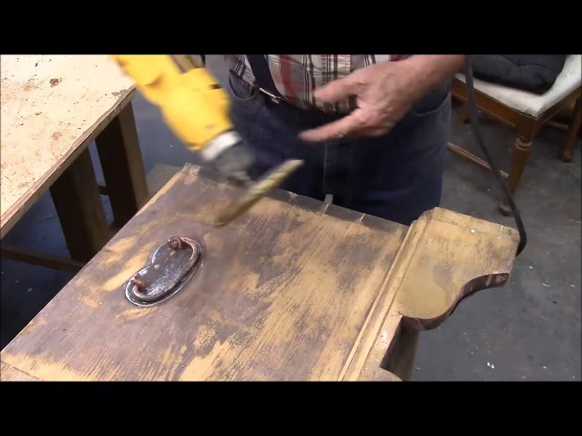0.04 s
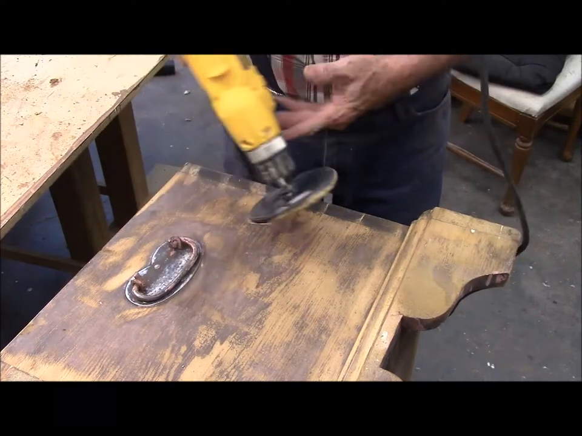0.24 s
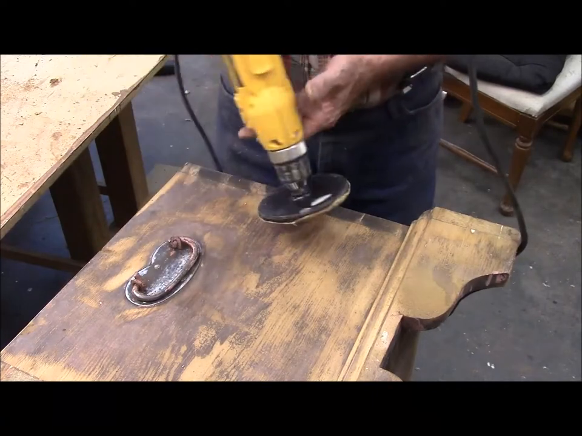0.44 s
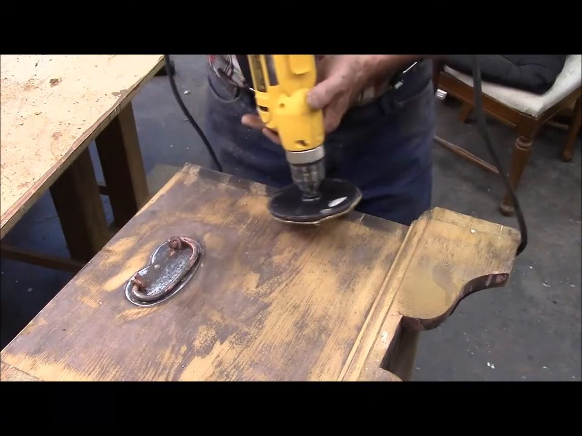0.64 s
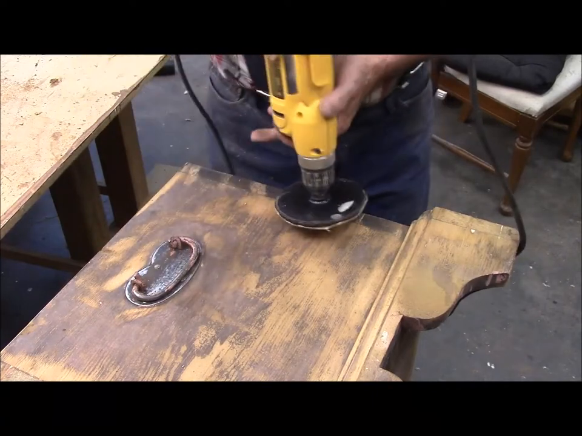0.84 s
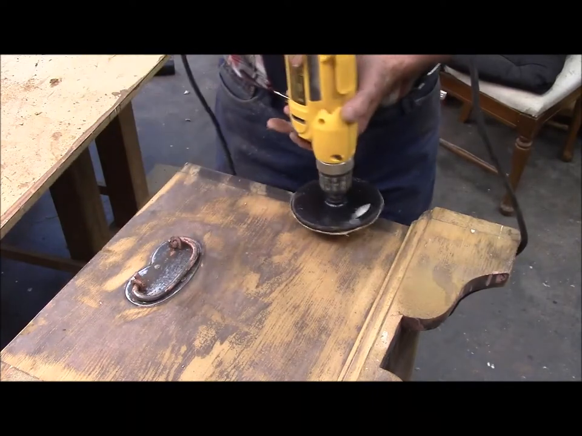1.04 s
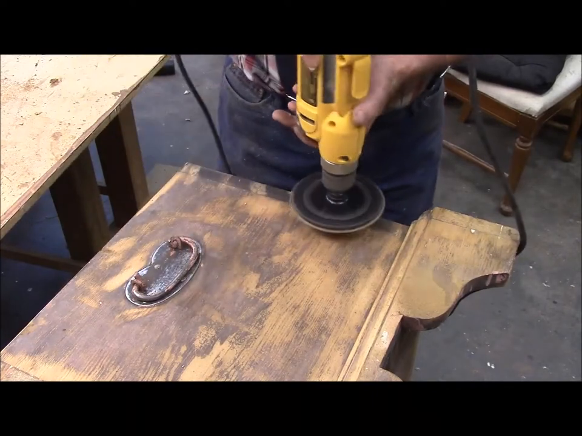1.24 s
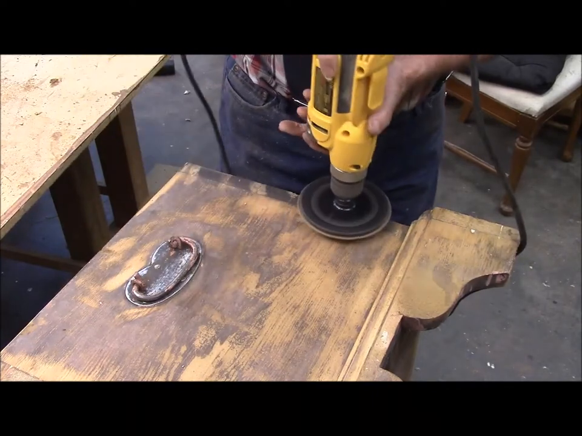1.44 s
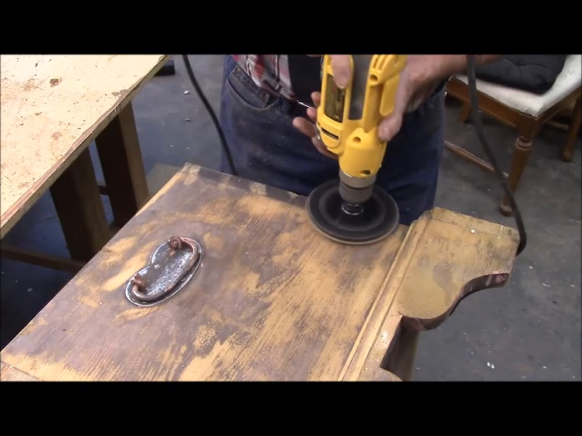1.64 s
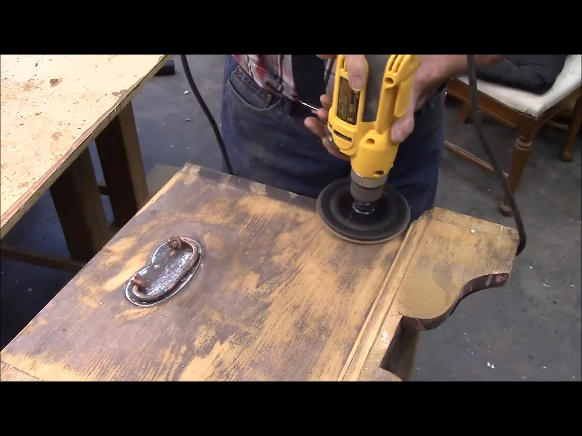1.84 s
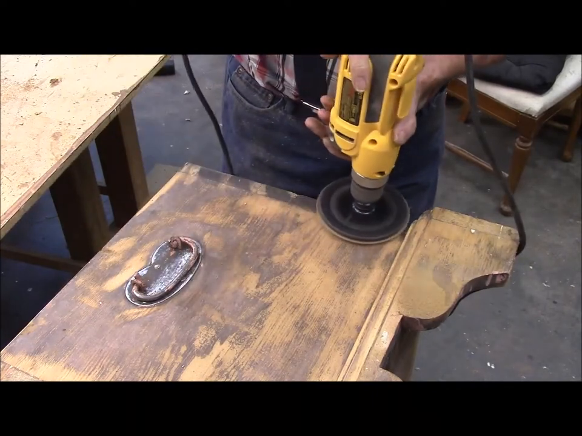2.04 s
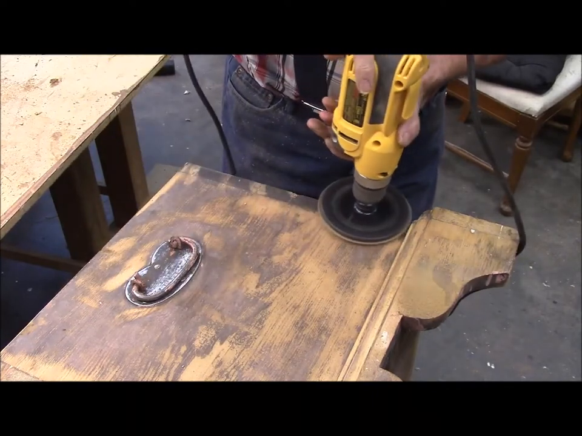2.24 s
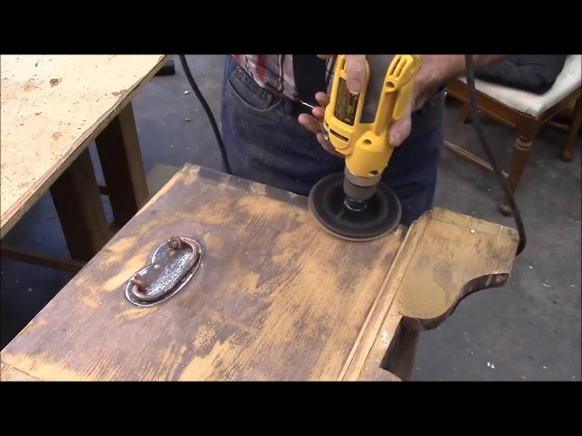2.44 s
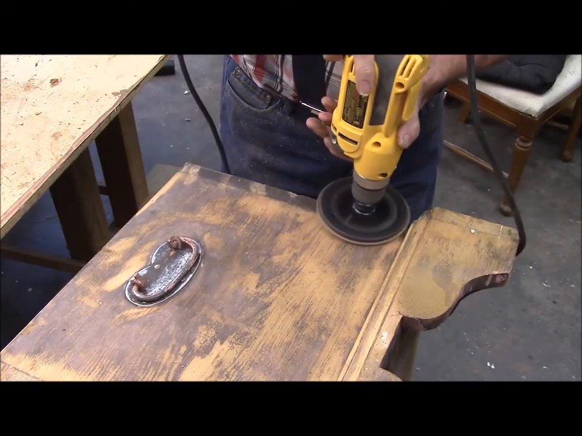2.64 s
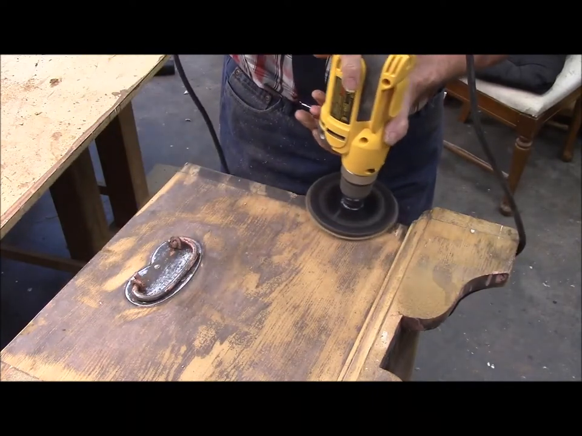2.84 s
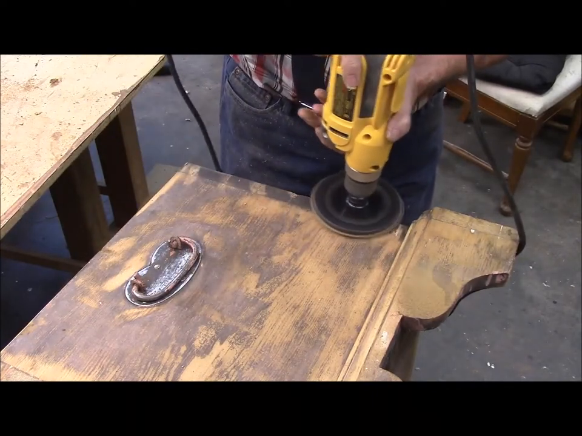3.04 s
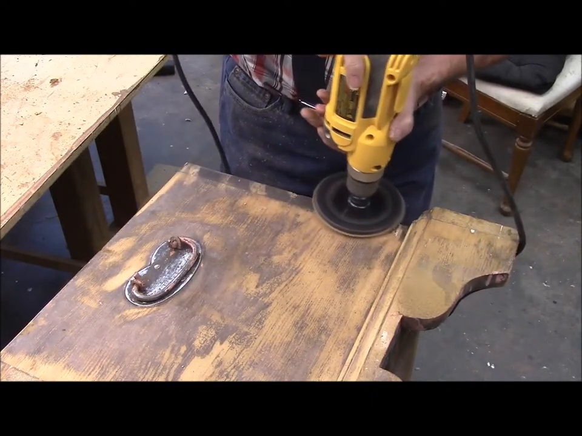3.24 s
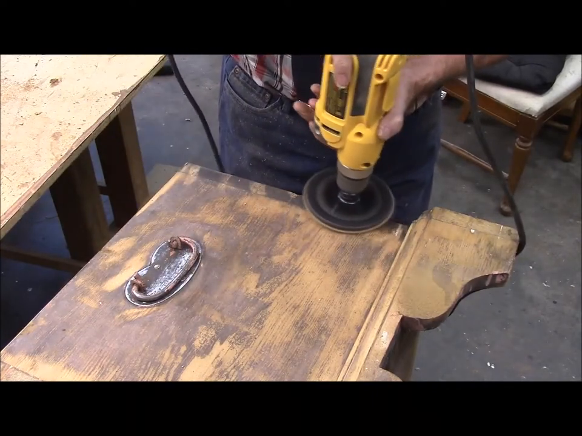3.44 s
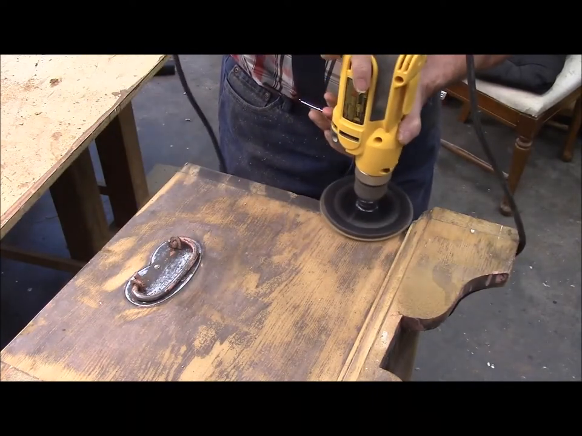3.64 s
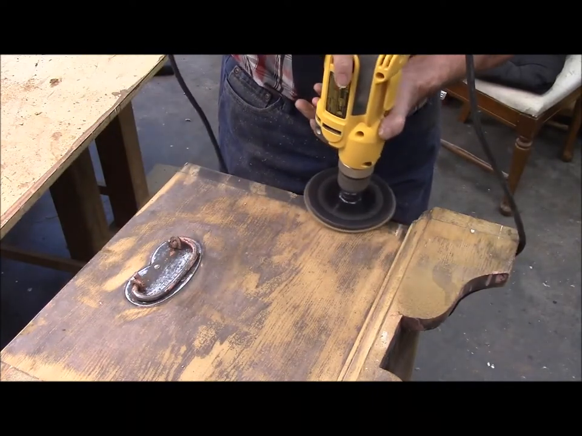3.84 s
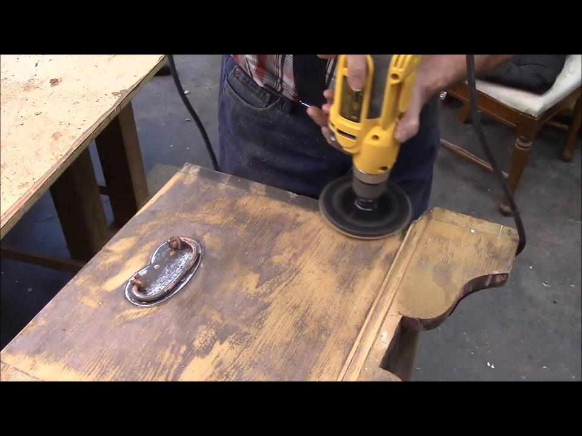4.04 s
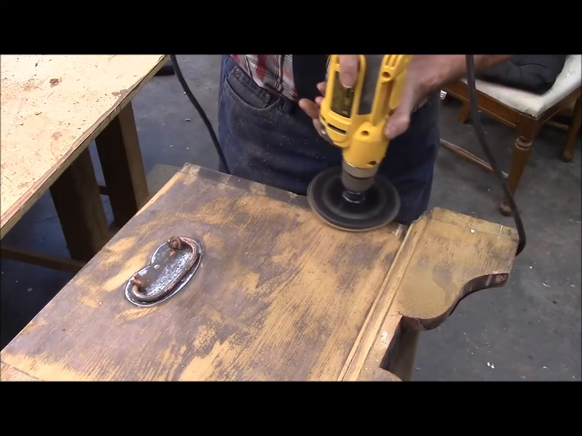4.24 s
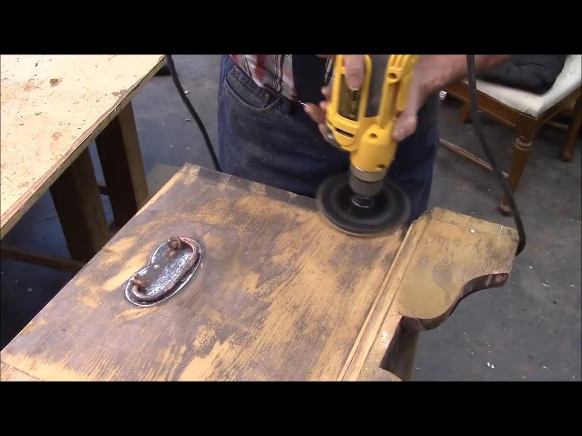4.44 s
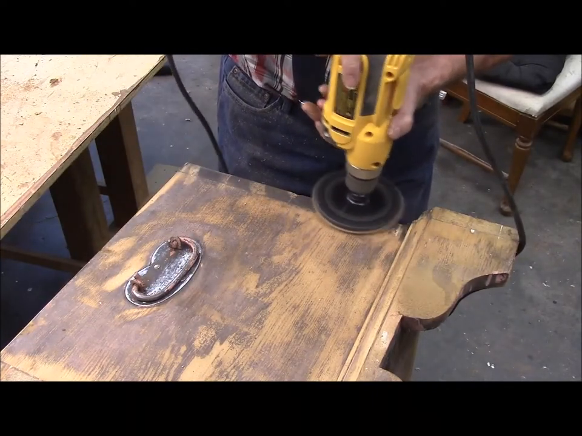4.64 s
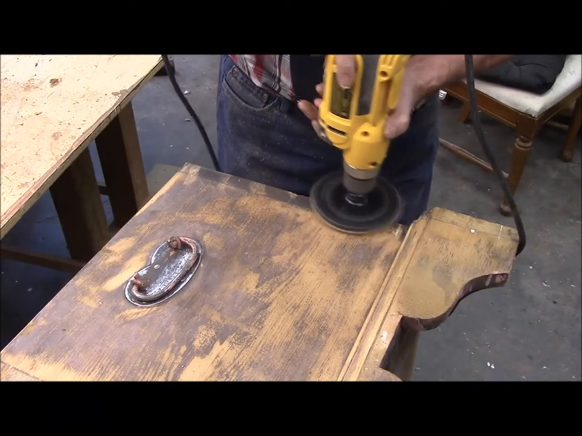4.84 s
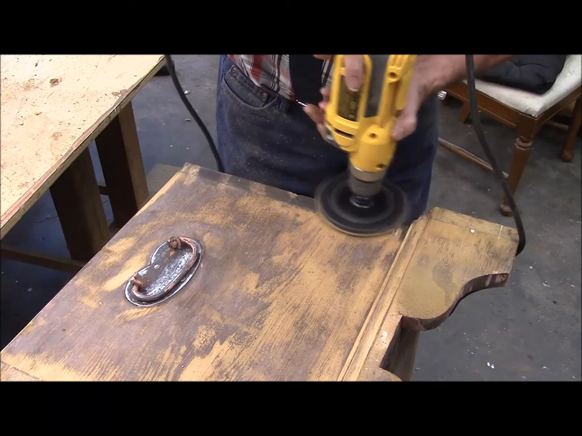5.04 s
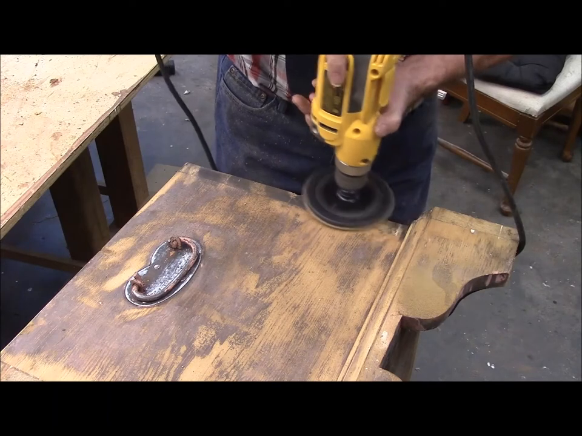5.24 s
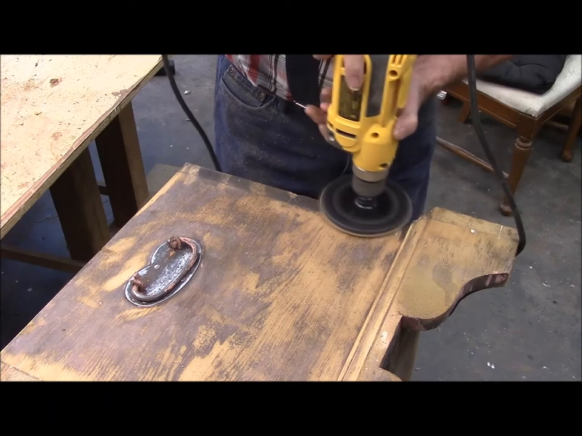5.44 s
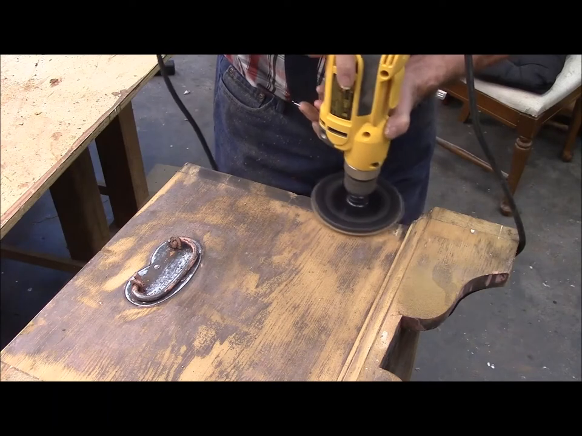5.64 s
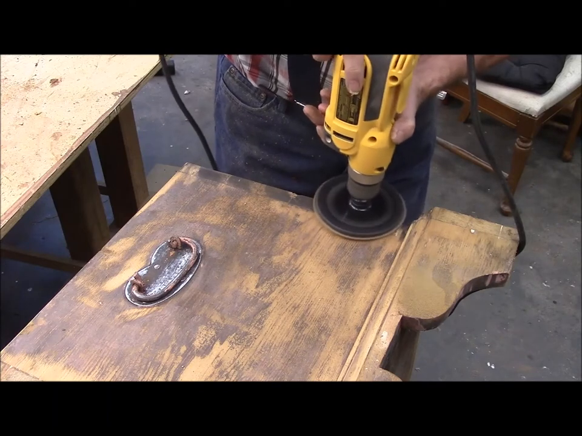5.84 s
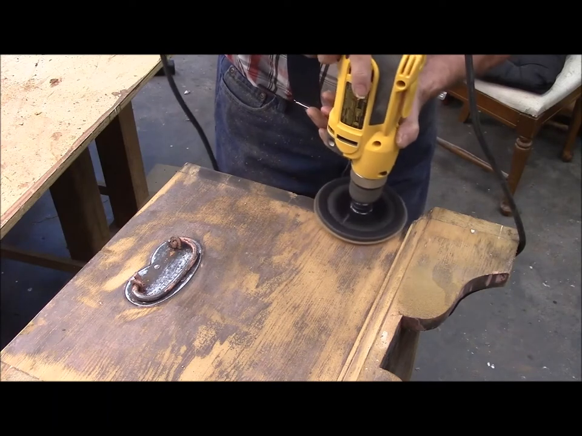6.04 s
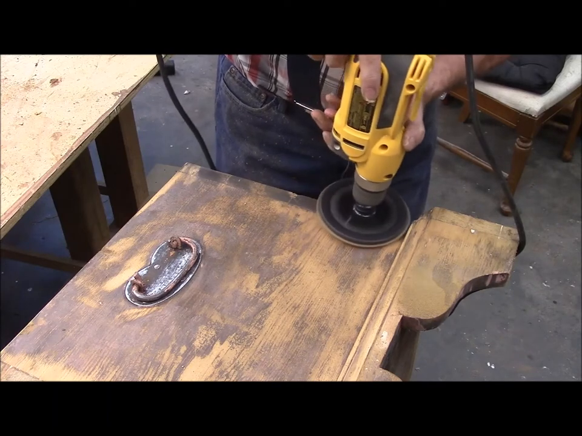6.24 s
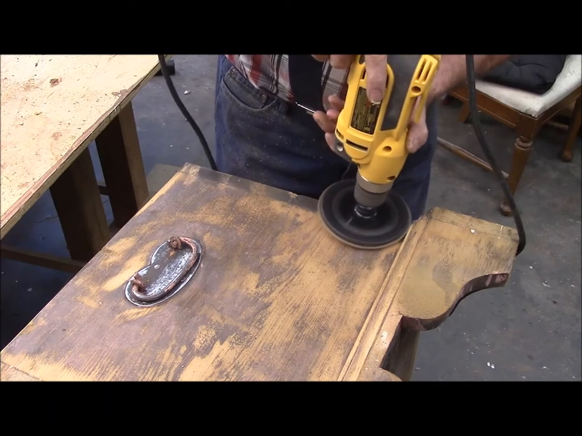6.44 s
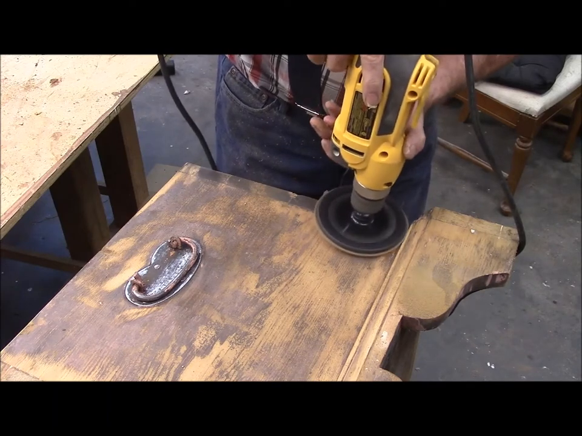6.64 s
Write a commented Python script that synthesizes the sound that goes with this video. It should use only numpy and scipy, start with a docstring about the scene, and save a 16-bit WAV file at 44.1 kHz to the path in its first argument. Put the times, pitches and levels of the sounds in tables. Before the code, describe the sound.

From 0 to about 1.1 seconds there is only a quiet workshop: low fan hum and rumble, soft clothing rustle, and tiny ticks of hands on a plastic housing near 0.1, 0.4 and 0.8. At about 1.08 a tight burst of hard, dry gear clacks lasts a tenth of a second with a short room wash. The drill motor leaps up, reaching a first pitch by 1.3, sags slightly with a labouring, buzzing growl and a thin whistle, then climbs again from 1.45 to about 1.9. It peaks near 2.1, eases down by 3.5 and stays nearly level, rising a touch around 5.8 and dipping at the end. Throughout, a loud low drone and whine carry grainy gear rattle, coarse scraping and bright abrasive hiss on wood, fluttering with disc rotation and small pressure changes. The sound is close and centred, still running at the cutoff around 6.7.

```python
"""Electric drill sanding a wooden panel

A workshop fan hums and clothes rustle; hands tick on the housing, then the gears clack as they take up slack.
The motor runs up in two steps, then sags a little under load: shaft speed sets the tones, whine and labouring.
Rattle, scrape and hiss are filtered noises that follow pad pressure and waver with shaft and pad rotation.
Both channels carry the same signal."""
import sys
import numpy as np
from scipy.fft import rfft, irfft, next_fast_len
from scipy.io import wavfile
from scipy.ndimage import uniform_filter1d, map_coordinates

SR = 44100
rng = np.random.default_rng(int(sys.argv[2]) if len(sys.argv) > 2 else 0)


def store_pcm(level_fs):
    """Save levels as 16-bit WAV."""
    pcm = np.round(np.clip(level_fs, -1, 1) * 32767).astype(np.int16)
    wavfile.write(sys.argv[1], SR, np.atleast_2d(pcm).T)


N = 295911
TIME = np.arange(N) / SR
CRUISE_HZ = 438  # working speed of the motor shaft, turns per second


def amp(db):
    """Decibels to gain."""
    return 10 ** (np.asarray(db) / 20)


def unit(x):
    """Scale to rms 1."""
    return x / np.sqrt(np.mean(x ** 2) + 1e-20)


def curves(rows):
    """One value per sample for each column after the time."""
    s, *cols = np.transpose(rows)
    return [np.interp(TIME, s, c) for c in cols]


def wobble(rate_hz):
    """A smooth random curve with rate_hz knots a second."""
    knots = rng.standard_normal(int(N * rate_hz / SR) + 4)
    return map_coordinates(knots, [TIME * rate_hz])


def filtered(x, response):
    """Multiply the spectrum of x by a response of frequency."""
    size = next_fast_len(N + SR // 2)
    spectrum = rfft(x, size) * response(np.fft.rfftfreq(size, 1 / SR))
    return irfft(spectrum, size)[..., :N]


def muffled(x, edge_hz, order):
    """Low-pass of the given steepness."""
    return filtered(x, lambda hz: (1 + (hz / edge_hz) ** (2 * order)) ** -.5)


def noise(spectrum, flutter=1):
    """Noise of rms 1, shaken by flutter and then coloured by (f/Hz, level/dB) points."""
    hz, db = np.transpose(spectrum)
    colour = lambda f: amp(np.interp(np.log(f + 1), np.log(hz), db))
    return unit(filtered(rng.standard_normal(N) * flutter, colour))


def partial(angle, order, rough, rate_hz, in_step=False):
    """One multiple of a rotation at rms 1, wavering in size and phase."""
    waver = 1 + rough * (wobble(rate_hz) + 1j * wobble(rate_hz))
    offset = 0 if in_step else 2 * np.pi * rng.random()
    return unit(np.real(waver * np.exp(1j * (order * angle + offset))))


def bursts(events, t60_s):
    """A sharp rise and an exponential decay at each (t/s, level/dB) row."""
    total = 0
    for s, db in events:
        total = total + amp(db - 60 * np.maximum(TIME - s, 0) / t60_s) * (TIME >= s)
    return total


def workshop():
    """A fan hums, clothes rustle and hands tick; the recorder turns all of these down once the loud drill runs."""
    # before the drill starts [t/s, room rumble level/dB, clothes rustle level/dB]
    idle = [(0, -33, -50), (.2, -29.5, -45.5), (.55, -30, -44), (.79, -27.5, -47.5), (.82, -27.5, -40),
            (.87, -24.5, -40.5), (.93, -28, -41), (1.05, -26, -39)]
    # fan tones [f/Hz, relative level/dB]
    fan_tones = [(58, -15), (407, -2), (815, -15), (1223, -23)]
    # room rumble spectrum [f/Hz, relative density/dB]
    room_spectrum = [(15, -37), (25, -17), (113, -9.5), (334, -10), (399, -5.5), (521, -8.5), (812, -13),
                     (991, -18), (1260, -19.5), (1480, -24.5), (1690, -22), (2350, -30), (5000, -43),
                     (6500, -57), (11000, -120)]
    # clothes rustle spectrum [f/Hz, relative density/dB]
    rustle_spectrum = [(1470, -29), (2500, -1), (4080, -1.5), (5470, -3.5), (9650, -2.5), (13800, -9),
                       (15100, -26), (15600, -20)]
    # light ticks of the hands on the housing [t/s, relative peak level/dB]
    ticks = [(0.1002, -37), (0.3751, -27), (0.8056, -18)]

    room_db, rustle_db = curves(idle)
    recorder_gain_db, = curves([(1.08, 1.5), (1.2, -13), (1.6, -14.5), (3, -16)])  # t/s, gain/dB
    hum = sum(amp(db) * partial(2 * np.pi * hz * TIME, order=1, rough=0.15, rate_hz=16) for hz, db in fan_tones)
    rumble = amp(0.69 * wobble(14)) * noise(room_spectrum)
    air = amp(room_db) * (rumble + amp(-1.0) * hum)
    rubbing = amp(rustle_db + wobble(6.9))
    tapping = amp(-16) * bursts(ticks, t60_s=0.03)
    hands = (rubbing + tapping) * noise(rustle_spectrum, amp(1.7 * wobble(900)))
    return (air + hands) * amp(recorder_gain_db)


def clacks():
    """Each blow of the teeth jars the gearbox, with a short wash from the bench and walls."""
    # gear teeth taking up slack [t/s, relative peak level/dB]
    blows = [(1.0795, 3), (1.0875, -6), (1.1135, -9), (1.1185, -11), (1.1298, -0.5), (1.1385, 4),
             (1.162, -3), (1.1795, 2), (1.1865, -16)]
    # gearbox spectrum [f/Hz, relative density/dB]
    gearbox = [(150, -26), (400, 1.5), (900, 2), (1450, -1), (1850, -1), (2300, -6), (2700, -16),
               (3600, -34), (4200, -15), (5800, -25), (6900, -17), (11000, -27), (15500, -47)]

    direct = bursts(blows, t60_s=0.0082)
    wash = amp(-19.5) * bursts(blows, t60_s=0.17)
    return amp(-1) * (direct + wash) * noise(gearbox)


def motor(angle, speed_hz, labour):
    """Slots whine as the motor gains speed; labouring gears growl, chopped by the speed control."""
    # slot whine [multiple of the shaft, level at working speed/dB, slope/dB per octave of speed]
    slot_orders = [(12, -35.5, -16), (40, -33.5, -7)]
    # whine of the labouring motor [multiple of the shaft, level at full labour/dB]
    labour_orders = [(23, -47), (25, -49), (29, -47), (36, -49), (40, -56)]
    # thin commutator whistle [t/s, level/dB]
    whistle_level = [(1.17, -42), (1.3, -37), (1.45, -35), (1.7, -35), (1.85, -42), (2, -56), (3.2, -53),
                     (3.9, -44), (6.6, -43)]
    # casing resonance [f/Hz, relative density/dB]
    casing = [(400, -28), (800, -10.5), (960, -1), (1030, 6), (1120, -2), (1300, -23), (2200, -86)]
    mains_hz = 60

    gain_hz_per_s = np.maximum(uniform_filter1d(np.gradient(speed_hz) * SR, size=2205), 0)  # 50 ms mean
    pull = np.minimum(gain_hz_per_s / 1400, 1) ** 0.65 * np.clip(speed_hz / 200, 0, 1) ** 7
    octaves = np.log2((speed_hz + 1) / CRUISE_HZ)
    slots = pull * sum(amp(db + slope * octaves) * partial(angle, order=round(k), rough=0.41, rate_hz=120)
                       for k, db, slope in slot_orders)
    whine = muffled(slots, edge_hz=11700, order=20)  # the housing holds in the highest whine
    whine += labour * sum(amp(db) * partial(angle, order=round(k), rough=0.7, rate_hz=130)
                          for k, db in labour_orders)
    whine += amp(curves(whistle_level)[0]) * partial(angle, order=24, rough=0.25 + .4 * labour, rate_hz=70)
    growl_gain = amp(-38.5 + 22.6 * labour) * np.clip(speed_hz / 230, 0, 1) ** 2
    growl = growl_gain * noise(casing)
    ripple = np.cos(2 * np.pi * 2 * mains_hz * TIME)
    chopping = 1 + (0.09 + 0.46 * labour) * ripple
    return chopping * (whine + growl) + amp(-56.5) * ripple


def housing_db(hz):
    """Boost of a tone as it passes the resonances of the housing."""
    # resonances that lift a passing shaft order [f/Hz, half width/Hz, boost/dB]
    resonances = [(1060, 90, 15), (1674, 220, 11), (4360, 120, 8.5)]
    return sum(db / (1 + ((hz - centre) / width) ** 4) for centre, width, db in resonances)


def shaft_tones(angle, speed_hz, press_db):
    """Imbalance sounds the low orders; fan and bearings add weak high ones."""
    # first shaft order [t/s, level/dB]
    first_level = [(1.14, -24), (1.22, -18), (1.3, -15.5), (1.43, -16.5), (1.8, -11.5), (2.05, -13),
                   (2.9, -13), (3.65, -14.5), (5.2, -14), (6.2, -13.5), (6.7, -14.5)]
    # second shaft order [t/s, level/dB]
    second_level = [(1.17, -31), (1.24, -26), (1.36, -20), (1.58, -19.5), (1.75, -16.5), (2.3, -13),
                    (2.55, -17.5), (2.75, -13), (3.1, -17.5), (3.38, -14), (3.65, -17.5), (4, -15.5),
                    (5.3, -16), (6.45, -19), (6.7, -18)]
    # weak overtones of bearings and brushes [multiple of the shaft, level/dB]
    overtones = [(3, -33.5), (5, -39.5), (8, -43), (9, -47), (11, -46.5), (14, -46), (17, -56), (21, -51)]

    first_gain = amp(curves(first_level)[0] + 0.43 * wobble(15))
    first = first_gain * partial(angle, order=1, rough=0.064, rate_hz=22, in_step=True)
    second_gain = amp(curves(second_level)[0])
    second = second_gain * partial(angle, order=2, rough=0.076, rate_hz=22, in_step=True)
    fourth_gain = amp(-33 + housing_db(4 * speed_hz) + .5 * press_db)
    fourth = fourth_gain * partial(angle, order=4, rough=0.22, rate_hz=44)
    fan = amp(-50 + housing_db(10 * speed_hz)) * partial(angle, order=10, rough=.25, rate_hz=14)
    bearings = sum(amp(db) * partial(angle, order=round(k), rough=0.27, rate_hz=10) for k, db in overtones)
    return first + second + fourth + fan + bearings


def sanding(angle, speed_hz, labour, press_db):
    """Gear teeth rattle once a turn; grit catches unevenly as the slower pad sweeps the wood."""
    # spinning disc [t/s, rim ring level/dB, thrum level/dB]
    disc = [(1.1, -48, -54), (1.3, -46, -53), (1.8, -43, -51), (2.3, -35, -45), (2.9, -39, -60),
            (5.7, -43, -53), (6.2, -37, -52), (6.7, -35, -47)]
    # gear rattle spectrum [f/Hz, relative density/dB]
    rattle_spectrum = [(60, -47), (200, -25.5), (370, -12), (600, -9.5), (800, -5), (1030, 0), (1200, -1.5),
                       (1500, 0.5), (1780, 1.5), (2050, -5), (2400, -11), (2750, -24.5), (4000, -65)]
    # gear rattle [t/s, base level/dB, share of its upper edge that is heard/0-1]
    rattle_level = [(1.15, -20.5, 1), (1.26, -14.5, 0.93), (1.8, -15, 1), (2.15, -16.5, 0.99),
                    (2.5, -16, 1), (5.6, -15, 1), (6.3, -16.8, 0.4)]
    # coarse scrape spectrum [f/Hz, relative density/dB]
    scrape_spectrum = [(1500, -16), (2600, -6), (3000, -3), (3500, 1), (4000, -2), (4600, -1.5), (5200, -1),
                       (5700, -11.5), (7000, -42)]
    # coarse scrape [t/s, relative level/dB]
    scrape_level = [(1.15, -26.5), (1.35, -35.5), (1.75, -30.5), (3.3, -32), (5.7, -32), (5.95, -31.5),
                    (6.4, -30.5), (6.65, -30.5)]
    # abrasive hiss spectrum [f/Hz, relative density/dB]
    hiss_spectrum = [(3290, -36), (5600, -6), (6320, -1.5), (7830, -0.5), (8390, -1.5), (9300, 0),
                     (12000, -7.5), (13500, -10.5), (14500, -14), (15600, -35)]
    # rim ring spectrum [f/Hz, relative density/dB]
    ring_spectrum = [(3800, -31), (4480, -8.5), (5000, -24), (5800, -35), (7400, -9), (8500, -19),
                     (8950, 1), (9200, -2), (9450, -6), (9900, -15), (12000, -49)]
    gear_ratio = 11.4  # shaft turns per pad turn

    ring_db, thrum_db = curves(disc)
    pad_angle = angle / gear_ratio
    sweep = amp(.5 * np.sin(pad_angle) + 0.55 * wobble(70) + 0.28 * wobble(18))
    teeth = amp(0.41 * np.cos(angle) + 0.41 * wobble(600) + 0.34 * wobble(14))
    grit = amp(.7 * np.cos(angle) + 1.05 * wobble(2500))

    gears = noise(rattle_spectrum, teeth)
    dull = muffled(gears, edge_hz=1400, order=6)
    gears = dull + (speed_hz / CRUISE_HZ) ** 3.2 * (gears - dull)  # faster teeth strike brighter
    rattle_db, edge = curves(rattle_level)
    gears = edge * gears + (1 - edge) * muffled(gears, edge_hz=2060, order=10)
    rattle = amp(rattle_db + 3.84 * labour + 0.63 * press_db) * gears

    scrape_gain = amp(curves(scrape_level)[0] - 0.45 + 1.2 * press_db)
    scrape = scrape_gain * noise(scrape_spectrum, grit)
    hiss = amp(-28.0 + 0.99 * press_db) * noise(hiss_spectrum, grit)
    ring = amp(ring_db) * noise(ring_spectrum)
    # the disc runs slightly out of true
    thrum = amp(thrum_db) * partial(pad_angle, order=1, rough=0.29, rate_hz=3.1)
    return sweep * (rattle + scrape + hiss + ring) + thrum


def scene():
    """Shaft speed and pad pressure drive the drill, over the clacks and the workshop."""
    # motor shaft [t/s, speed/turns per second]
    shaft_speed = [(1.17, 203.6), (1.2, 243), (1.21, 266.6), (1.23, 285.6), (1.24, 304.9), (1.26, 322.3),
                   (1.29, 335.0), (1.31, 338.3), (1.44, 314), (1.46, 324), (1.5, 343), (1.55, 380),
                   (1.58, 392), (1.67, 416), (1.7, 425.8), (1.9, 455.0), (2.12, 461.1), (2.46, 456.5),
                   (3.19, 441), (3.25, 439), (3.51, 434.1), (5.1, 437), (5.28, 435), (5.77, 446),
                   (6.24, 443.3), (6.62, 430.4)]
    # pad pressure on the wood, as hiss level; only its departure from the median counts [t/s, level/dB]
    pressure = [(1.28, -26.7), (1.58, -27.2), (1.82, -26.2), (2.12, -28.3), (2.29, -26.9), (2.95, -27.8),
                (3.04, -28.9), (3.25, -28.2), (3.49, -29.3), (3.58, -28.0), (3.7, -29.4), (3.82, -27.5),
                (3.94, -29.0), (4.24, -28.1), (4.42, -29.6), (4.54, -27.8), (4.6, -29.5), (4.87, -29.5),
                (4.96, -27.7), (5.23, -30.3), (5.32, -28.4), (5.71, -29.1), (6.19, -26.9), (6.28, -28.5),
                (6.37, -27.5), (6.43, -29.0), (6.52, -26.8), (6.65, -26.8)]
    start_s, kick_s, fade_in_s = 1.11, .06, 0.036  # shaft leaves rest, ramps to first speed, becomes audible
    labour_span_hz = 97  # this far below working speed the motor labours fully

    since_start_s = np.maximum(TIME - start_s, 0)
    kicked_hz = curves(shaft_speed)[0] * np.minimum(since_start_s / kick_s, 1)
    speed_hz = np.abs(uniform_filter1d(kicked_hz, size=882))  # 20 ms mean
    angle = 2 * np.pi * np.cumsum(speed_hz + 0.35 * wobble(12)) / SR
    labour = np.clip((CRUISE_HZ - speed_hz) / labour_span_hz, 0, 1)
    pressure_db, = curves(pressure)
    press_db = pressure_db - np.median(pressure_db)

    drill = motor(angle, speed_hz, labour)
    drill += shaft_tones(angle, speed_hz, press_db)
    drill += sanding(angle, speed_hz, labour, press_db)
    mono = workshop() + clacks() + np.minimum(since_start_s / fade_in_s, 1) * drill
    return np.array([mono, mono])


def record(dry):
    """The recorder rounds off the highest peaks and keeps nothing above its band limit."""
    top_hz = 15800
    rounded = dry / (1 + np.abs(dry / .93) ** 8) ** (1 / 8)
    return filtered(rounded, lambda hz: hz < top_hz)


dry = scene()
out = record(dry)
store_pcm(out)
```